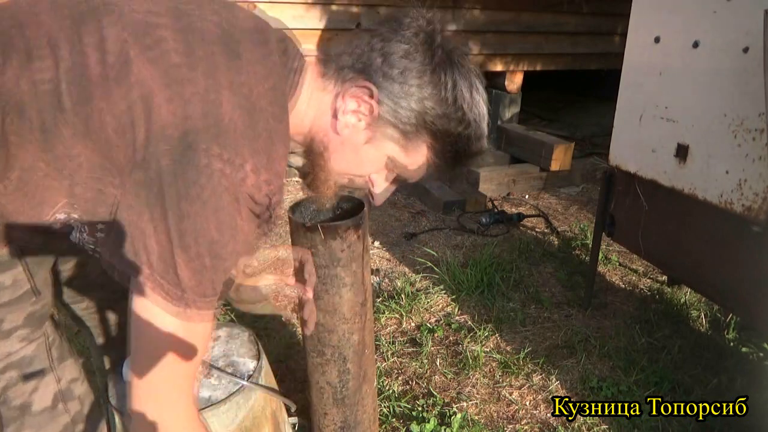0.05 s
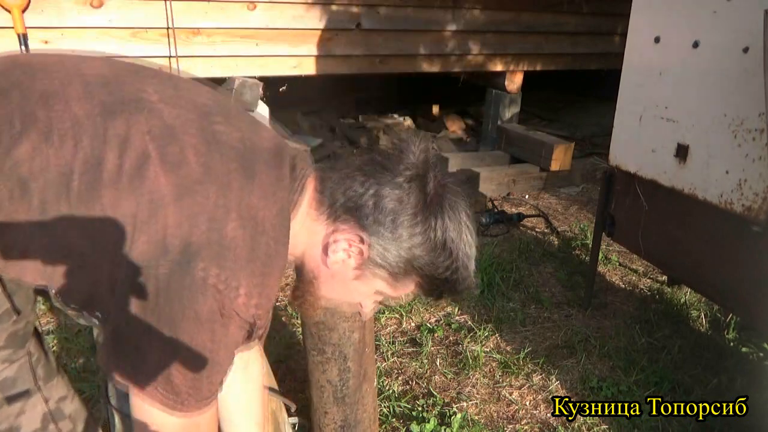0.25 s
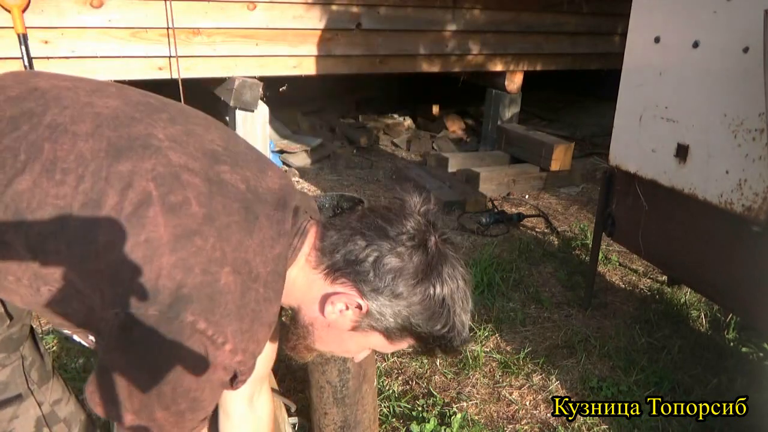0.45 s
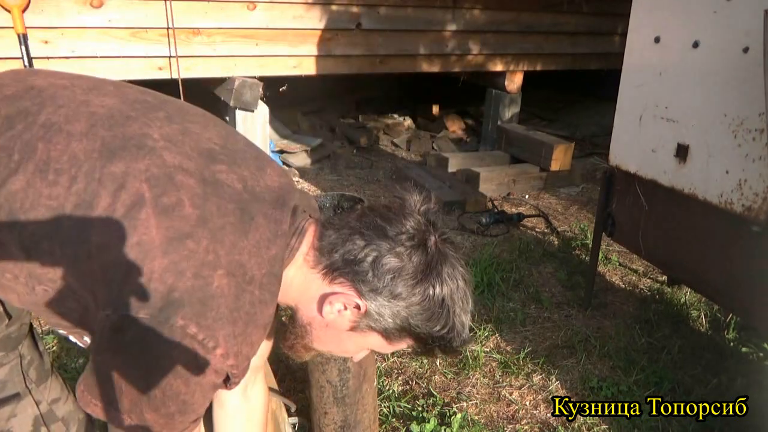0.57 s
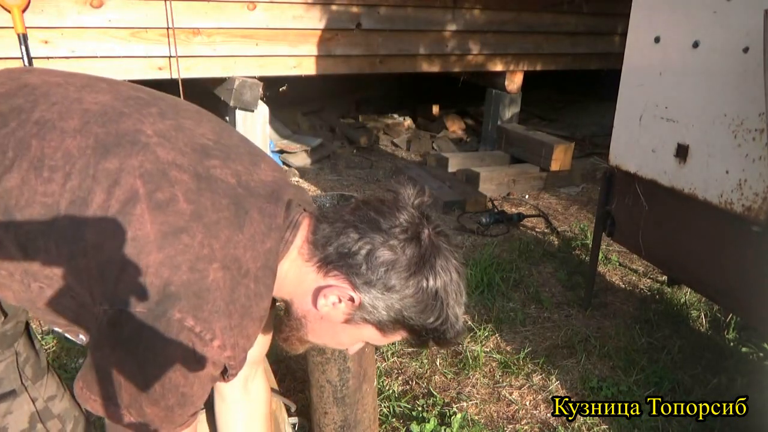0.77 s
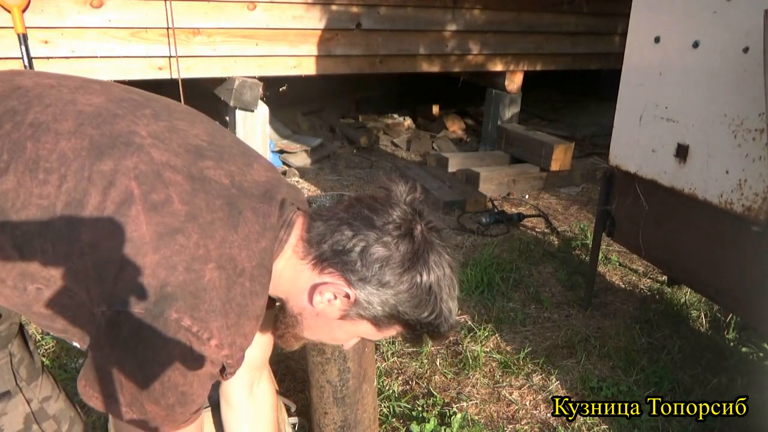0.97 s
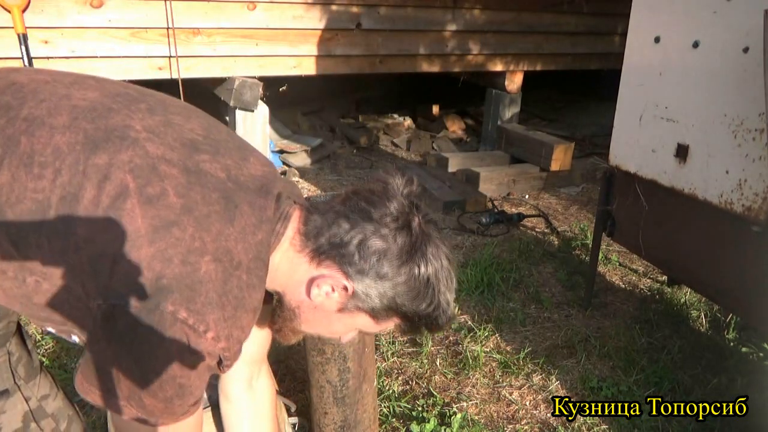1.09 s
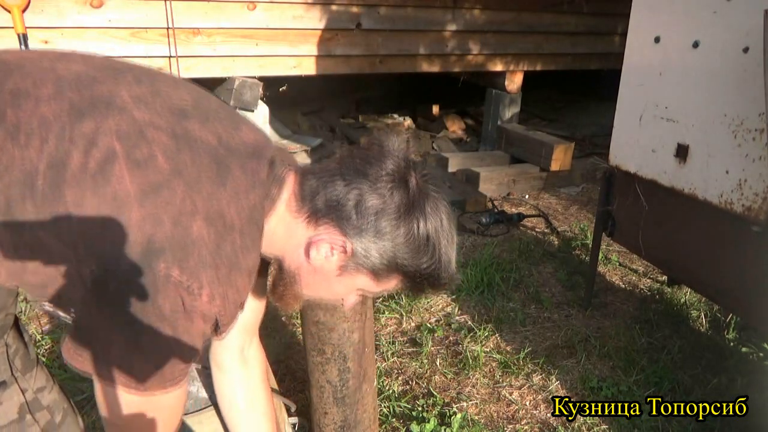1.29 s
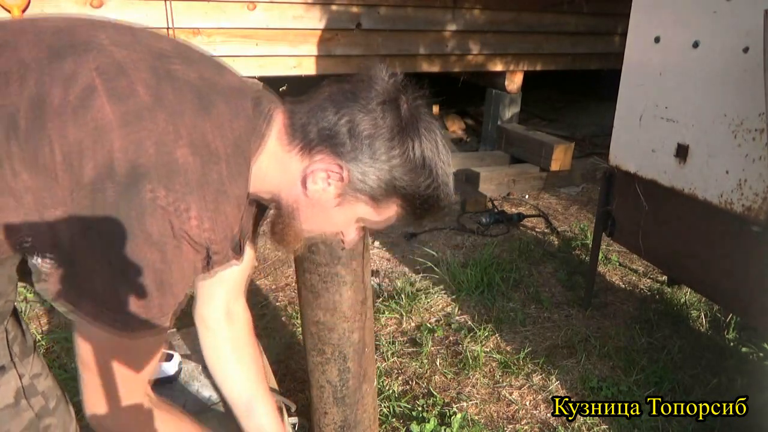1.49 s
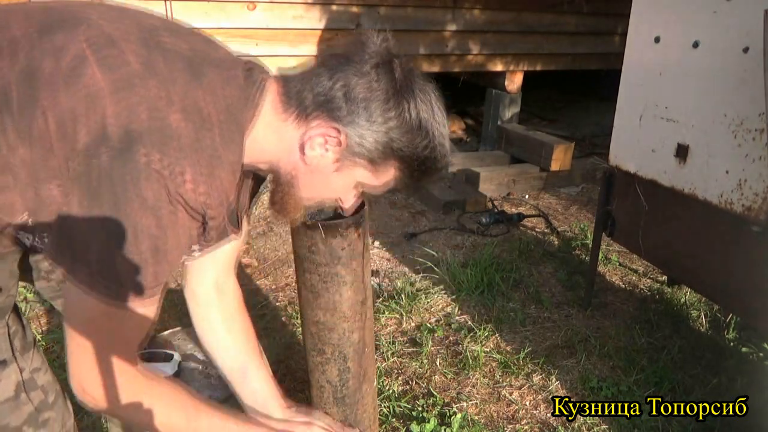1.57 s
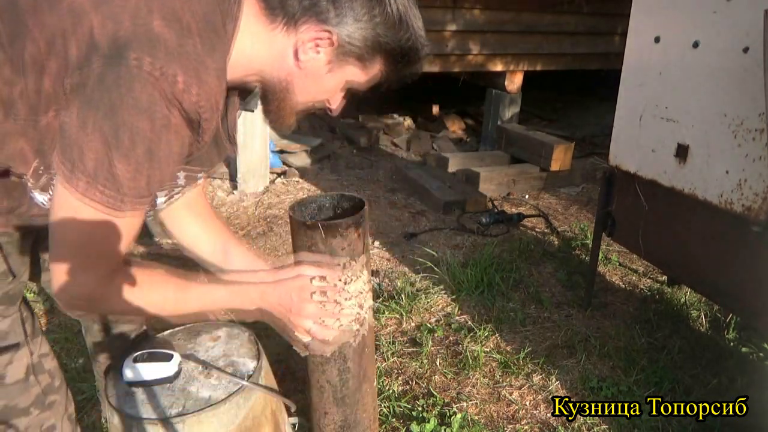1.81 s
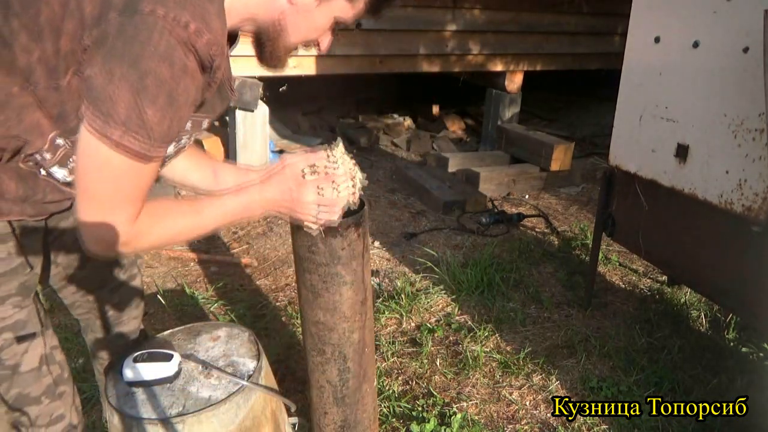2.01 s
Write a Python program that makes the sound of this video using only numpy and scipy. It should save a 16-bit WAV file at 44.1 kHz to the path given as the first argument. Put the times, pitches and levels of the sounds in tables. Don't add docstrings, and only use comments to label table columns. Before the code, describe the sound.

Dry wood chips scooped by hand in a crunchy rustling burst, then scattered ticks settling outdoors

```python
import sys
import numpy as np
from scipy import signal
from scipy.fft import rfft, irfft
from scipy.io import wavfile
from scipy.ndimage import uniform_filter1d

SR = 44100
rng = np.random.default_rng(int(sys.argv[2]) if len(sys.argv) > 2 else 0)


def boost_factor(decibels):
    exponent = np.asarray(decibels, float) / 20
    return 10 ** exponent


def waveform_to_disk(signal):
    frames = np.transpose(np.atleast_2d(signal))
    scaled = np.clip(frames, -1, 1) * 32767
    samples = np.round(scaled).astype(np.int16)
    wavfile.write(sys.argv[1], SR, samples)


N = 90404
LEFT_RIGHT = np.array([[1], [-1]])

# time in seconds, shavings level in dB, thick chips against it in dB.
STROKES = [
    [(0.218, -56, 2), (0.225, -48.5, 0), (0.24, -45.5, -9.5), (0.306, -47.5, -3.5), (0.335, -50.5, 5)],
    [(0.34, -42, 2.5), (0.356, -46.5, 9), (0.363, -36, 0.5), (0.395, -39.5, 4), (0.41, -43.5, 8.5),
     (0.416, -47, 0.5), (0.43, -50, 3)],
    [(0.435, -49, 7), (0.462, -39.5, 0), (0.485, -36, 1), (0.509, -33.5, 3), (0.528, -36.5, 2.5),
     (0.56, -39.5, 2.5)],
    [(0.565, -40, 0.5), (0.583, -41.5, 1), (0.655, -40, 3.5), (0.681, -43.5, 2), (0.725, -42, 5),
     (0.755, -48.5, 0.5)],
    [(0.76, -46.5, 6.5), (0.769, -43.5, 3.5), (0.79, -41.5, 4), (0.866, -41, -5.5), (0.9, -49.5, -4),
     (0.925, -49.5, -2)],
    [(0.93, -52, 3.5), (1.0, -45.5, 2.5), (1.042, -42, 5), (1.084, -36.5, 1), (1.122, -42.5, 4),
     (1.2, -48.5, -2), (1.306, -55.5, -0.5), (1.36, -58, -1)],
]
# start in seconds, peak in
# dB, pitch in Hz, upper modes in dB.
KNOCKS = [(0.316, -34, 820, -18), (0.34, -31, 834, -19), (0.358, -20, 790, -27), (0.379, -20, 890, -17),
          (0.504, -29, 780, -2), (0.65, -27, 680, -5), (0.717, -27, 810, -9), (0.774, -20, 770, -20),
          (0.778, -25, 800, -19), (0.843, -30.5, 496, -18), (0.988, -27.5, 526, -20),
          (1.008, -29.5, 473, -1), (1.033, -24.5, 660, -9), (1.051, -24.5, 613, -27),
          (1.076, -24, 820, -16), (1.219, -28, 830, -28), (1.247, -30.5, 738, -20), (1.311, -33.5, 740, -7),
          (1.348, -40, 706, -18), (1.464, -50, 875, -11), (1.506, -32, 840, 14.5), (1.619, -41.5, 837, -15),
          (1.649, -47, 950, 1.5), (1.721, -36, 1150, 17), (1.848, -40.5, 845, 7), (1.855, -45.5, 577, -4),
          (1.878, -51, 478, -8),
          (1.2185, -29, 1450, -18),
          (0.404, -30, 900, -12), (0.47, -25.5, 1120, -13), (0.49, -36, 710, -12),
               (0.521, -30, 690, -12), (0.538, -24.5, 800, -9), (0.964, -36, 630, -12),
               (1.07, -24.5, 597, -15), (1.089, -30, 520, -7), (1.113, -34, 710, -3),
               (1.142, -32.5, 554, -17), (1.17, -36, 636, -15), (1.389, -39, 705, 11), (1.434, -46, 550, 6),
               (0.176, -53, 475, -13), (0.897, -40, 490, -18), (2.014, -55, 950, -15)]
# start in seconds, peak in dB, pitch in Hz, level in dB for modes above 1.3
THUMPS = [
    (0.22, -41, 314, 15),
    (0.354, -34.5, 345, -16),
]
# start in seconds, peak in dB, body against edge in dB, body pitch in Hz.
TICKS = [(0.239, -22, -40, 4070), (0.361, -26, -13, 3260), (0.392, -23, -10, 5200),
         (0.4865, -22, -20, 3000), (0.4116, -27.5, -1, 2520), (0.4236, -31, 2, 4500),
         (0.496, -26, 8.5, 4200), (0.5055, -24, 7, 2600), (0.474, -24, 3, 2950), (0.5218, -30, 0, 2060),
         (0.5372, -18.5, -3, 2650), (0.567, -25, -6, 4000), (0.594, -29, -12, 5500), (0.692, -31, 1, 4000),
         (0.727, -24, 0, 6200), (0.769, -21, -6, 1870), (0.89, -30.5, 2, 4000), (1.057, -32, 0, 1900),
         (1.078, -25, -5, 3000), (1.0842, -20, 0, 5800), (1.091, -26, 1, 3200), (1.138, -30, -5, 6000),
         (1.249, -31.5, -2.5, 2820), (1.3116, -42, 13, 2650), (1.3548, -25, -31, 2890),
         (1.4153, -22, -32, 2910), (1.4723, -34, -26, 2970), (1.497, -28.5, -7, 4440),
         (1.5093, -25, 0.5, 4660), (1.518, -30, -8, 4410), (1.5354, -30.5, -11, 2650),
         (1.5533, -19.5, -12.5, 2860), (1.56, -22, -20, 4170), (1.5722, -33, -20, 2620),
         (1.587, -41, -15.5, 3000), (1.7216, -33.5, -14, 2550), (1.8157, -31, -30, 2220),
         (1.969, -37, -24.5, 2210), (1.9852, -37, -34.5, 2200)]
# start in seconds, peak in dB, body against edge in dB,
# body pitch in Hz, skid in seconds.
SCUFFS = [(0.17, -31.5, -19, 3300, 0.01), (1.381, -39, -22, 3000, 0.014),
          (1.419, -32.5, -11.5, 3200, 0.015), (1.439, -34, -23, 3500, 0.012),
          (1.699, -42, -11, 4000, 0.007), (1.5513, -31.5, -17.5, 2850, 0.014),
          (1.6164, -38, -9, 3180, 0.011), (1.619, -51, 3, 3150, 0.0046), (1.648, -53, 5.5, 2400, 0.006),
          (0.08, -51, -20, 3000, 0.0035), (1.6331, -33, -20, 2300, 0.0052),
          (1.6766, -34, -26, 1870, 0.0077), (1.7193, -32, -14, 2610, 0.0075),
          (1.7634, -38, -16.5, 3030, 0.008), (1.7764, -38.5, -14, 3760, 0.0099),
          (1.8333, -37, -9.5, 5500, 0.008), (1.843, -34, -12, 3340, 0.01),
          (1.8743, -31, -16.5, 3330, 0.0055), (1.9088, -38.5, -14, 3040, 0.0064)]
# frequency in Hz, density in dB per Hz.
SHAVINGS_SPECTRUM = [(880, -38), (1500, 2), (2210, -29), (3000, 6.5), (4920, -5), (9190, 11.5),
                     (12900, -12), (16000, -45)]
# frequency in Hz, density in dB per Hz.
CHIPS_SPECTRUM = [(59, -60), (100, -29), (330, -10.5), (605, 0), (960, -3.5), (1790, -4), (2420, -28.5),
                  (3120, -0.5), (4500, -54), (5850, -48), (9900, -120)]
# frequency in Hz, density in dB per Hz.
HUSH_SPECTRUM = [(35, -56), (60, -20.5), (767, -5.5), (924, -3), (1310, -7.5), (2900, -10), (10000, -14.5),
                 (16000, -24)]


def rms_one(x):
    return x / np.sqrt(np.mean(x ** 2) + 1e-20)


def at_hz(points, hz):
    table_hz, table_db = np.array(points).T
    return np.interp(np.log(hz), np.log(table_hz), table_db)


def drift(rate_hz):
    r = np.exp(-2 * np.pi * rate_hz / SR)
    noise = rng.standard_normal(N + SR // 2)
    return rms_one(signal.lfilter([1], [1, -2 * r, r * r], noise)[-N:])


def ring(clicks, hz, t60_s):
    r = boost_factor(-60 / (t60_s * SR))
    w = 2 * np.pi * hz / SR
    return signal.lfilter([0, np.sin(w)], [1, -2 * r * np.cos(w), r * r], clicks + 1e-18)


def band(x, low_hz, high_hz):
    edges_hz = [low_hz, min(high_hz, SR / 2.2)]
    return signal.sosfilt(signal.butter(2, edges_hz, "band", fs=SR, output="sos"), x + 1e-18)


def hush(width):
    hz = np.maximum(np.arange(N // 2 + 1) * SR / N, 1)
    spectra = rfft(rng.standard_normal((2, N))) * boost_factor(at_hz(HUSH_SPECTRUM, hz))
    mid, side = irfft(spectra, N)
    level_db = -62 + 0.41 * drift(4.1)
    return boost_factor(level_db) * rms_one(mid + width * side * LEFT_RIGHT)


def wall_slap(near):
    delay_s, level_db = 0.0044, -21
    return boost_factor(level_db) * np.roll(band(near[::-1], 280, 10500), int(delay_s * SR), axis=1)


def rumble(near):
    level_db, top_hz = -45, 89
    noise = rng.standard_normal(N) + 0.32 * rng.standard_normal((2, N))
    shove = uniform_filter1d(np.abs(near), size=200)
    return boost_factor(level_db) * band(shove * noise, 44, top_hz) * 10


def hollow():
    bin_hz, bin_t60_s, bin_db, lag_s = 189, 0.14, -7.5, 0.004
    clicks = np.zeros(N)
    for s, db, *_ in THUMPS:
        clicks[int((s + lag_s) * SR)] = boost_factor(db + bin_db)
    return band(ring(clicks, bin_hz, bin_t60_s), 117, 430)


def strikes(rows, modes, cycles, soft_hz, gain_db):
    out = np.zeros((2, N + SR))
    draws = rng.standard_normal((len(rows), 14))
    for (s, db, hz, upper_db), d in zip(rows, draws):
        click = np.zeros(8192)
        click[0] = 1
        click[int(SR * (1.6 + 0.3 * d[0]) / hz)] = 0.4
        body = 0
        for k, (ratio, mode_db) in enumerate(modes):
            level_db = mode_db + upper_db * (ratio > 1.3) + 2.1 * d[1 + k]
            mode_hz = hz * ratio * (1 + 0.0083 * d[7 + k])
            t60_s = cycles / hz / ratio ** 0.53
            body = body + boost_factor(level_db) * ring(click, mode_hz, t60_s)
        body = band(body, 150, soft_hz)
        pan = 1 + 0.086 * d[13] * LEFT_RIGHT
        i = int(s * SR)
        out[:, i:i + 8192] += boost_factor(db + gain_db) * body / np.abs(body).max() * pan
    return out[:, :N]


def palm_thumps():
    modes = [(0.99, 21), (0.92, -5.0), (1.27, -9)]
    return strikes(THUMPS, modes, cycles=11.0, soft_hz=900, gain_db=0.0)


def chip_knocks():
    modes = [(1.052, 26.5), (1.6, 2), (2.23, 11.5), (2.5, -3.0), (3.41, 14.5), (1.8, 7)]
    return strikes(KNOCKS, modes, cycles=15.2, soft_hz=5400, gain_db=-3.5)


def ticks():
    tick_s, first_touch = 0.0023, 0.74
    skid_rise = 0.22
    out = np.zeros((2, N + SR))
    t = np.arange(2048) / SR
    rows = [(*row, tick_s) for row in TICKS] + SCUFFS
    shape = (len(rows), 2048)
    skitter = (rng.random(shape) < 7000 / SR) * rng.standard_normal(shape)
    places = rng.standard_normal(len(rows))
    for (s, db, body_db, hz, skid_s), grit, place in zip(rows, skitter, places):
        fade = np.exp(-(t / max(skid_s, 0.0005)) ** 1.3)
        swell = np.minimum(t / (skid_rise * max(skid_s - tick_s, 1e-4)), 1)
        burst = grit * 0.41 * min(skid_s / 0.0034, 1) * fade * swell
        touch = 4 + int(skid_rise * max(skid_s - tick_s, 0) * SR)
        burst[touch] += first_touch * tick_s / max(skid_s, tick_s)

        edge = ring(burst, 9000 * (1 + 0.049 * place), 0.0011)
        edge = edge + 0.26 * ring(burst, 13000, 0.00096) + 0.3 * burst
        bright = band(band(edge, 4800, 21000), 3900, 24000)
        dull = band(ring(burst, hz, 7.1 / hz) + 0.25 * burst, 950, 7500)
        chip = boost_factor(-2.0) * bright + boost_factor(body_db + 2.5) * dull
        i = int(s * SR)
        out[:, i:i + 2048] += boost_factor(db) * chip * (1 + 0.2 * place * LEFT_RIGHT)
    return out[:, :N]


def spread(width):
    return 1 + width * rng.standard_normal(N) * LEFT_RIGHT


def grains(spectrum, low_hz, high_hz, per_s, uneven_db, cycles, clump_db, clump_hz, wide, width, thin_db, count):
    clump = clump_db * drift(clump_hz)
    born = rng.random(N) < per_s * boost_factor(clump + thin_db) / SR
    force = boost_factor(uneven_db * np.minimum(rng.exponential(1, N), 4)) * rng.choice([-1, 1], N)
    clicks = born * force * spread(width) * boost_factor(-thin_db / 2)
    dealt = rng.integers(0, count, N)
    broad = rng.random(N) < wide
    out = 0
    for k, hz in enumerate(np.geomspace(low_hz, high_hz, count)):
        mine = (dealt == k) + broad * rng.normal(0, 0.36, N)
        tone = rms_one(ring(clicks * mine, hz, cycles / hz))
        out = out + boost_factor(at_hz(spectrum, hz)) * np.sqrt(hz) * tone
    return rms_one(out)


def digging():
    settle_db_per_s, thin_db_per_s, chips_linger_db_per_s = -27, -35, 11.5
    s, rustle_db, weight_db = np.transpose(sum(STROKES, []))
    t = np.arange(N) / SR
    after_s = np.maximum(t - s[-1], 0)
    shavings_db = np.interp(t, s, rustle_db, left=-125) + settle_db_per_s * after_s
    chips_db = shavings_db + np.interp(t, s, weight_db) - 1.04 + chips_linger_db_per_s * after_s
    thin_db = thin_db_per_s * after_s
    shavings = grains(SHAVINGS_SPECTRUM, 1694, 15230, per_s=14000, uneven_db=-0.5, cycles=8.9,
                      clump_db=1.0, clump_hz=55, wide=0.066, width=0.17, thin_db=thin_db, count=24)
    chips = grains(CHIPS_SPECTRUM, 136.5, 4058, per_s=3000, uneven_db=1.5, cycles=18.6,
                   clump_db=2.0, clump_hz=34, wide=0.072, width=0.14, thin_db=thin_db, count=22)
    return boost_factor(shavings_db + 2.5) * shavings + boost_factor(chips_db) * chips


def scene():
    low_cut_hz, top_hz = 218, 14100
    contacts = digging() + ticks() + chip_knocks() + palm_thumps()
    softened = signal.sosfilt(signal.butter(3, top_hz, fs=SR, output="sos"), contacts)
    thinned = signal.sosfilt(signal.butter(3, low_cut_hz, "high", fs=SR, output="sos"), softened)
    near = rumble(contacts) + thinned + hollow()
    balance = boost_factor(0.3 * LEFT_RIGHT)
    return (near + wall_slap(near)) * balance + hush(width=0.69)


def roll_off(x):
    return signal.sosfilt(signal.butter(12, 16480, fs=SR, output="sos"), x)


def record(dry):
    cutoff_hz = 16080
    mix = signal.sosfilt(signal.cheby2(22, 45, cutoff_hz, fs=SR, output="sos"), dry)
    return roll_off(mix)


dry = scene()
out = record(dry)
waveform_to_disk(out)
```